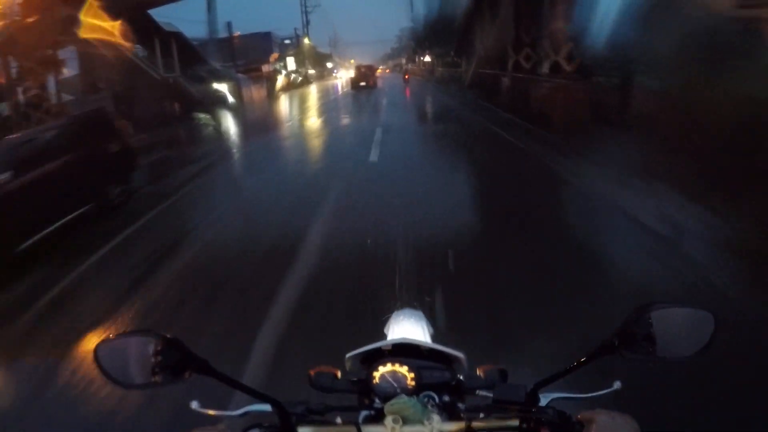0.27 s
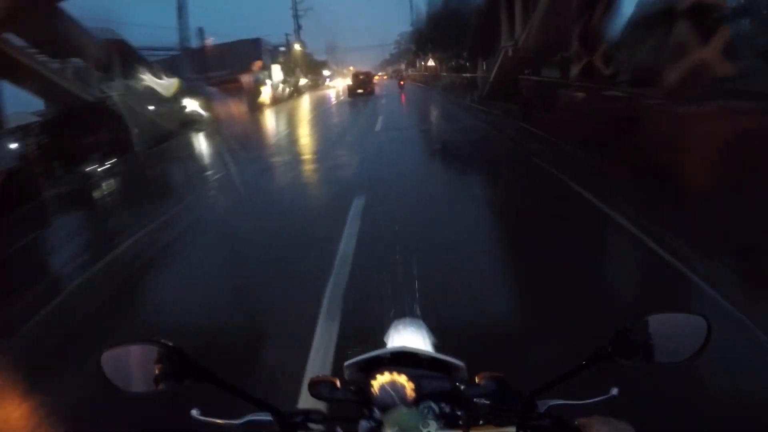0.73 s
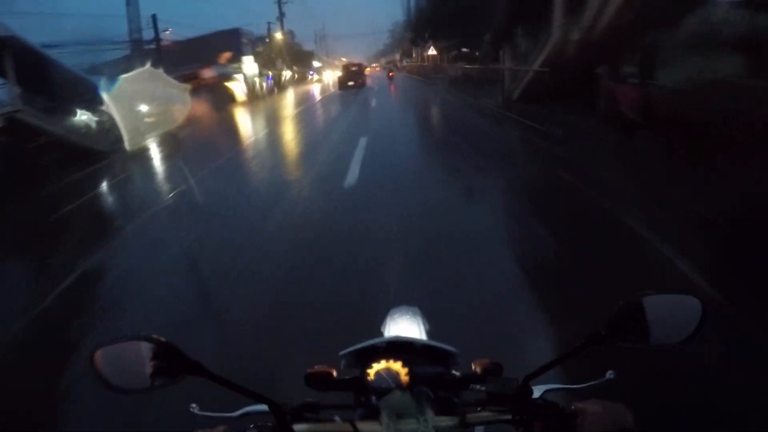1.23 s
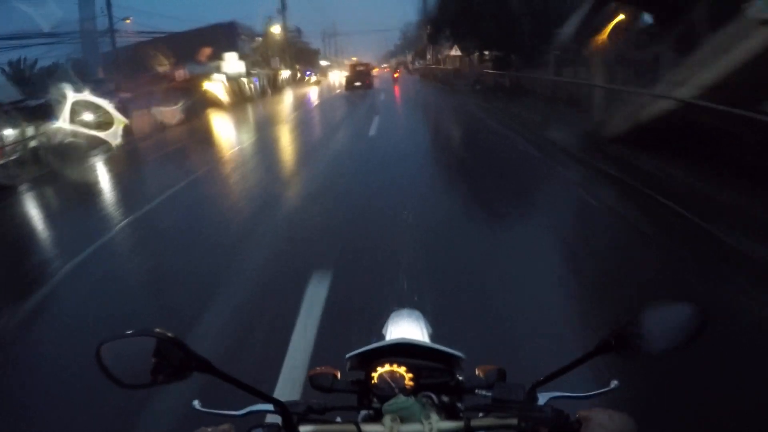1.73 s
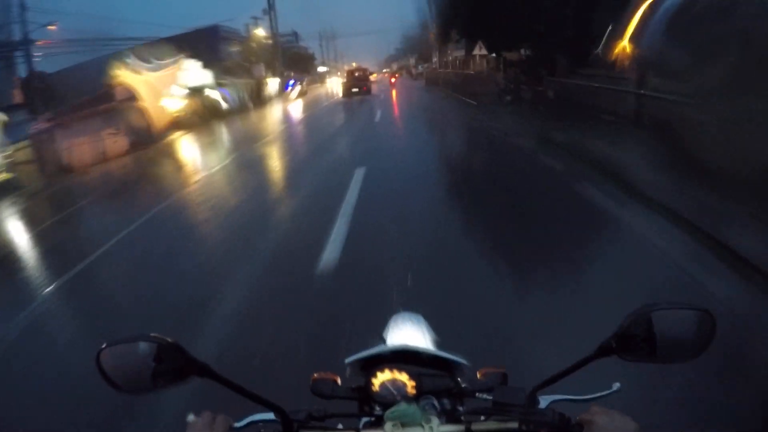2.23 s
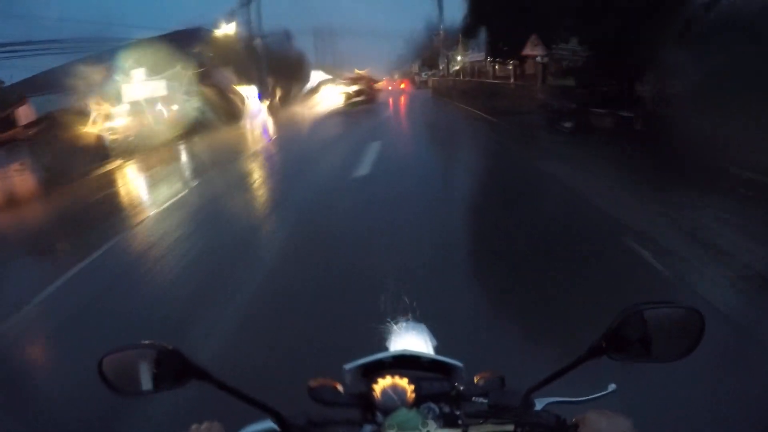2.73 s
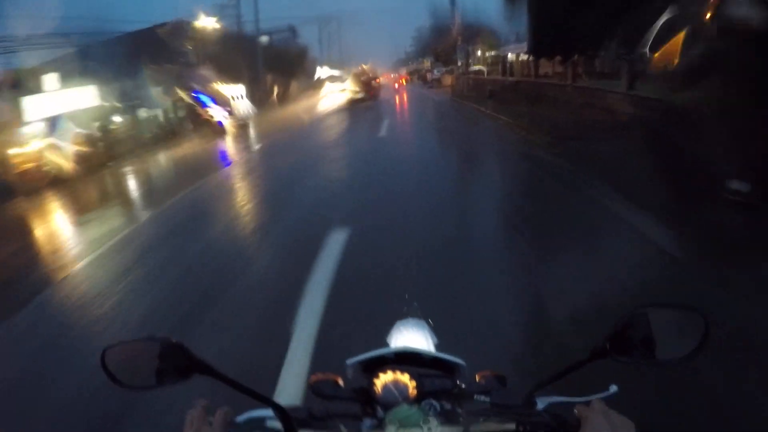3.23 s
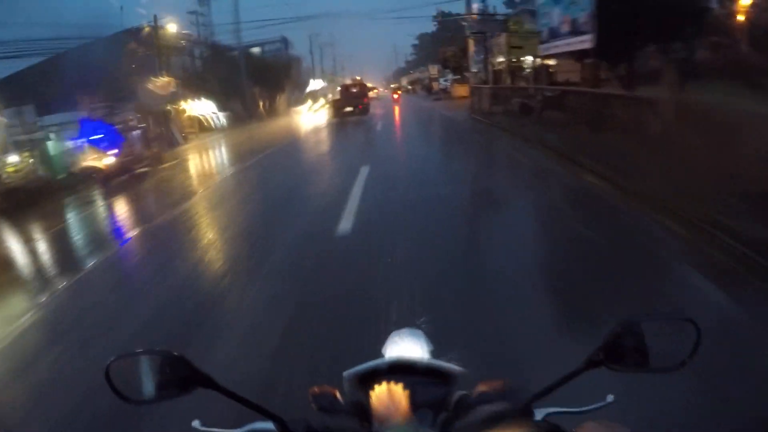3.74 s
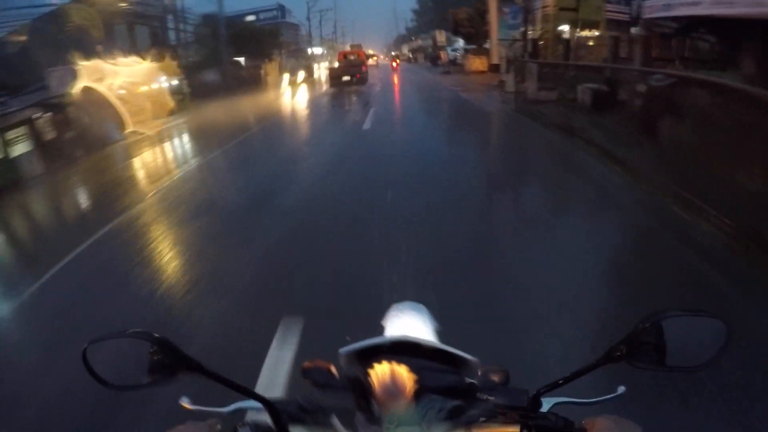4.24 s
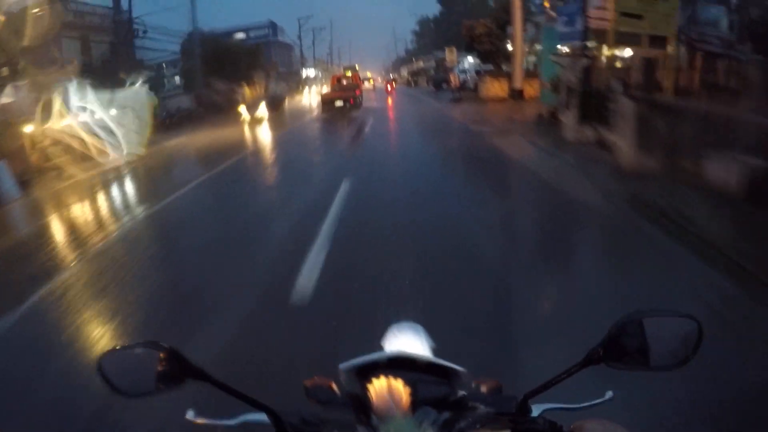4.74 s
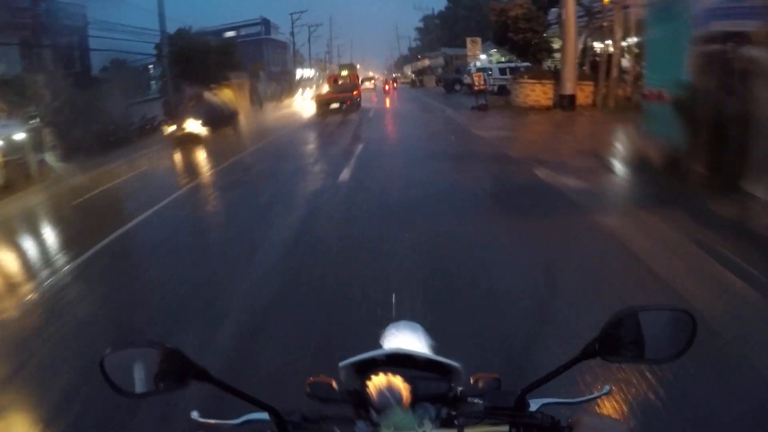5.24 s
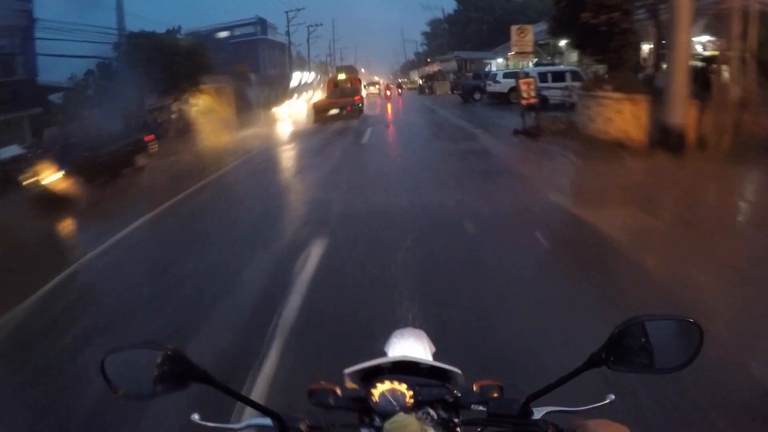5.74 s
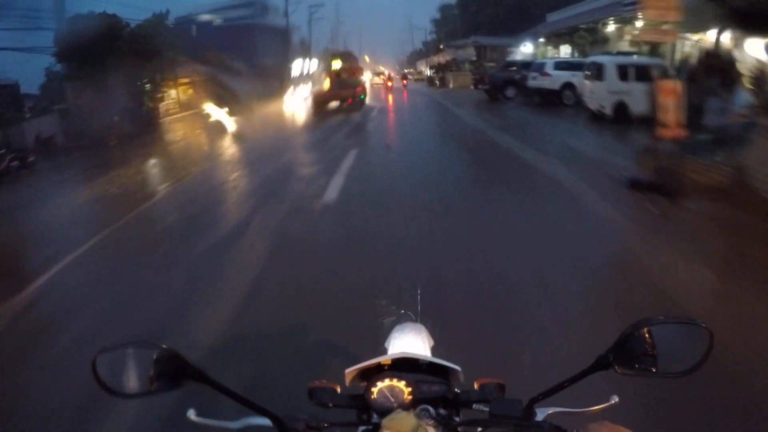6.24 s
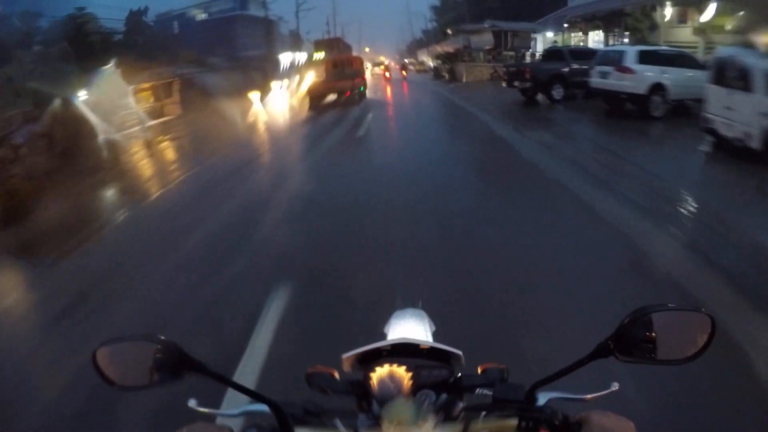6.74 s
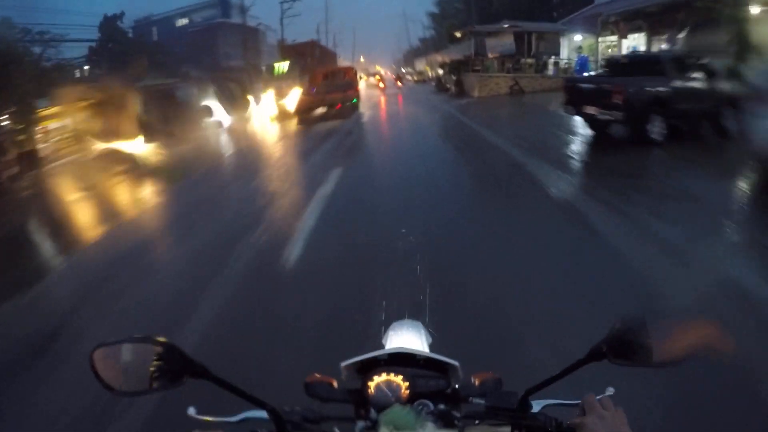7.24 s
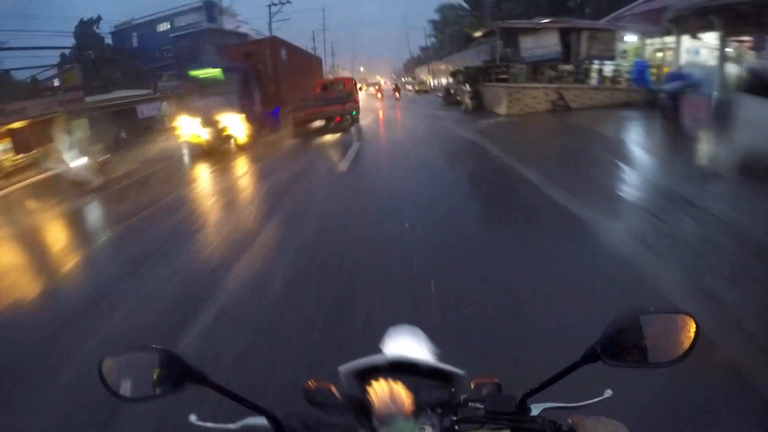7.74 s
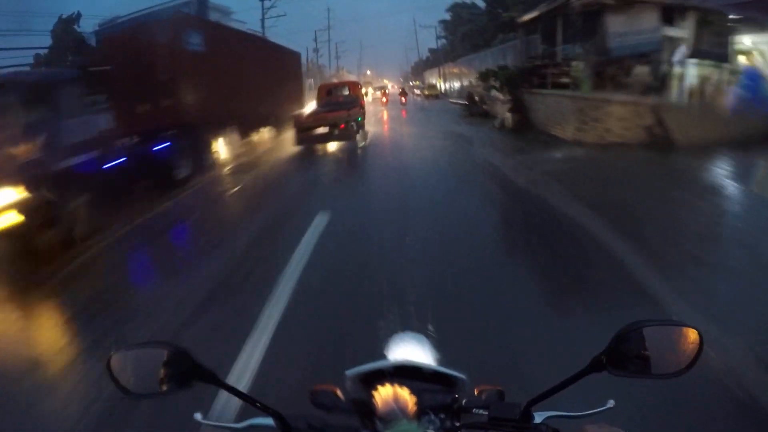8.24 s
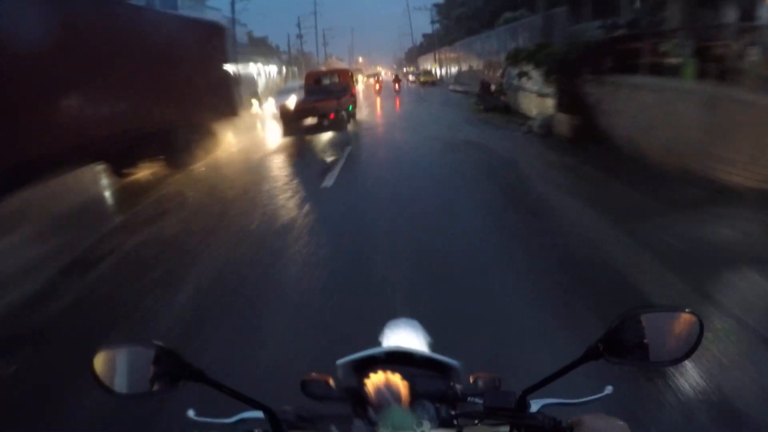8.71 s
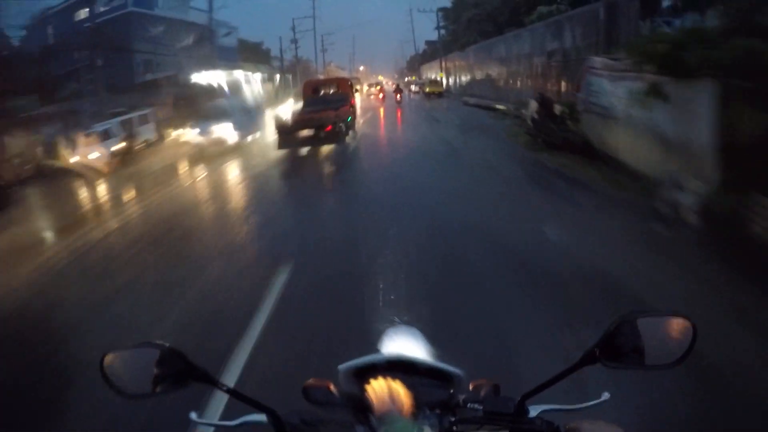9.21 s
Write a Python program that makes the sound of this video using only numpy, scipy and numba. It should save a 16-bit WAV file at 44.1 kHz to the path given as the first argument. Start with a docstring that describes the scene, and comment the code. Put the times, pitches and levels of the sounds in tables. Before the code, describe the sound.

Rain on a wet road ride, with the microphone enclosed in a thin plastic case. Irregular big drops crack and tick over fine dry patter, muffled wind buffeting and flickering hiss. After low thumps near the start the rain eases for a moment, then swells. Very faint high whistles drift in the middle and later part, and spray surges toward the end.

```python
"""Heavy rain on a motorcycle ride, heard inside the plastic housing of a helmet camera.
Throughout, drops ring the housing's short modes, small ones merge into a patter, wind noise rumbles, spray hisses.
From 0.2 s big drops crack, the biggest overloading the input; at 1.1 and 1.5 s dull knocks ring low.
Around 1.3 s the patter thins; it swells near 3 to 3.7 s. Faint high whistles come and go from 4 to 9 s.
The spray is strongest near 7.1 and 8.7 s."""
import sys
import numpy as np
from scipy import signal
from scipy.fft import rfft, irfft
from scipy.io import wavfile
from scipy.ndimage import uniform_filter1d
from numba import njit

SR = 44100
rng = np.random.default_rng(int(sys.argv[2]) if len(sys.argv) > 2 else 0)


def unload_wav(signal):
    """Save mono or channel-first audio to the path in sys.argv[1] as 16-bit WAV at rate SR, clipped to [-1, 1]."""
    wavfile.write(
        sys.argv[1],
        SR,
        np.round(np.clip(np.atleast_2d(signal).T, -1, 1) * 32767).astype(np.int16),
    )


def undo_db(level):
    """Turn decibels back into plain size, where 20 dB means ten times bigger."""
    steps = np.asarray(level, float) / 20
    return 10 ** steps


N = 417627  # samples


def unit(x):
    """Scale to rms 1."""
    return x / np.sqrt(np.mean(x ** 2))


def walk(rate_hz):
    """Random levels, each held 1 / rate_hz, smoothed twice; rms 1."""
    hold = int(SR / rate_hz)
    steps = np.repeat(rng.standard_normal(N // hold + 1), hold)
    smooth = uniform_filter1d(uniform_filter1d(steps, hold), hold)
    return unit(smooth[:N])


def flickering_noise(spectrum, flicker_db, rate_hz):
    """Coloured noise at rms 1; overlapping bands, half an octave apart, flicker independently."""
    hz, db = np.transpose(spectrum)
    octave = np.log2(np.fft.rfftfreq(N, 1 / SR) + 1)
    lowest, highest = np.log2(hz[0]), np.log2(hz[-1])
    bass_cut_db = 10 * np.clip(lowest - octave, 0, None)  # 10 dB per octave below the first row
    shape = undo_db(np.interp(octave, np.log2(hz), db) - bass_cut_db)
    noise = rfft(rng.standard_normal(N)) * shape
    out = 0
    for centre in np.arange(lowest - 1, highest + 1, .5):
        share = np.clip(1 - 2 * abs(octave - centre), 0, 1)
        out = out + irfft(noise * share, N) * undo_db(flicker_db * walk(rate_hz))
    return unit(out)


# Weather. Each row: time in seconds, wind level in dB, patter level in dB before each layer's offset,
# spray level in dB.
WEATHER = [(0.0, -35, -37.5, -43.5), (0.26, -31.5, -31.5, -37.5), (1.05, -41, -36, -45.5),
           (1.32, -40.5, -52.5, -46), (1.6, -36.5, -48, -43.5), (1.77, -38.5, -42.5, -47.5),
           (2.48, -38.5, -36, -44), (2.98, -36, -29.5, -37.5), (3.16, -41, -34, -44),
           (3.72, -31, -29.5, -37.5), (4.25, -42, -39.5, -47), (4.99, -41.5, -35, -44.5),
           (5.25, -37, -32.5, -45.5), (6.67, -34, -36.5, -41), (7.12, -31.5, -31.5, -34.5),
           (7.54, -36, -33, -38.5), (8.7, -34, -32, -33.5), (9.47, -34.5, -32, -37)]


def weather_db(column):
    """One level column of the weather, interpolated to every sample."""
    rows = np.array(WEATHER)
    return np.interp(np.arange(N) / SR, rows[:, 0], rows[:, column])


# Wind spectrum. Each row: frequency in Hz, relative density in dB per Hz.
WIND_SPECTRUM = [(22, 4), (45, -2), (66, 3), (80, -2.5), (95, 1), (135, -13), (185, -14), (300, -19),
                 (600, -29.5)]


def wind():
    """Wind buffeting the housing: low noise whose level wanders about the weather curve."""
    level_db = weather_db(1) + 2.76 * walk(7)
    return undo_db(level_db) * flickering_noise(WIND_SPECTRUM, flicker_db=0.93, rate_hz=12)


# Spray spectrum. Each row: frequency in Hz, relative density in dB per Hz.
SPRAY_SPECTRUM = [(600, -5.5), (1030, -6), (1300, 7), (1500, 0), (2600, 0), (3370, -11), (4700, -8),
                  (5350, -14.5), (7600, -26), (8400, -27), (15000, -32.5)]


def spray():
    """Road spray heard through the housing: a hiss whose bands flicker fast."""
    return undo_db(weather_db(3)) * flickering_noise(SPRAY_SPECTRUM, flicker_db=3.5, rate_hz=28)


# Faint whistles. Each row: start in seconds, end in seconds, start frequency in Hz, end frequency in Hz,
# mean level in dB.
WHISTLE_TONES = [(4.35, 5.25, 13780, 13700, -69), (4.05, 4.65, 12300, 12200, -75),
                 (5.65, 6.17, 13600, 13300, -66), (5.9, 6.15, 12000, 11800, -70),
                 (6.85, 7.0, 11450, 11400, -70), (7.08, 7.3, 11250, 11400, -65),
                 (7.8, 7.92, 11250, 11400, -68), (8.0, 8.6, 12750, 12950, -70),
                 (8.45, 8.95, 11250, 11500, -71)]


def whistles():
    """Thin high sines that glide, waver fast, flicker and fade in and out."""
    t = np.arange(N) / SR
    out = 0
    for start_s, end_s, from_hz, to_hz, db in WHISTLE_TONES:
        glide_hz = np.interp(t, [start_s, end_s], [from_hz, to_hz])
        hz = glide_hz * (1 + .005 * walk(400))
        fade = np.clip(np.minimum(t - start_s, end_s - t) / .06, 0, 1)
        level = undo_db(db + 3 * walk(20))
        out = out + fade * level * np.sin(2 * np.pi * np.cumsum(hz) / SR)
    return out


@njit
def ring(start_s, hz, gain, t60_s, rise_cycles, size, sr):
    """Every blow starts every mode: a sine that swells over some cycles, then dies away."""
    out = np.zeros(size)
    for e in range(start_s.shape[0]):
        for m in range(start_s.shape[1]):
            pole = np.exp(2j * np.pi * hz[e, m] / sr - np.log(1000) / (t60_s[e, m] * sr))
            z, gap, close = gain[e, m] + 0j, 1., np.exp(-hz[e, m] / (rise_cycles * sr))
            first = int(start_s[e, m] * sr)
            for j in range(max(first, 0), min(first + int(t60_s[e, m] * sr), size)):
                z, gap = z * pole, gap * close
                out[j] += z.imag * (1 - gap)
    return out


# Dull knocks. Each row: start in seconds, level in dB, frequency in Hz, t60 in seconds.
KNOCK_RINGS = [(1.144, -13.5, 67, 0.11), (1.515, -19.5, 84, 0.21), (1.521, -18, 170, 0.077)]


def knocks():
    """Low decaying rings of the whole housing on its mount."""
    s, db, hz, t60_s = np.transpose(KNOCK_RINGS)[:, :, None]
    return ring(s, hz, undo_db(db), t60_s, 0.1, N, 1. * SR)


# Housing modes. Each row: nominal frequency in Hz, relative level in dB, nominal t60 in seconds.
HOUSING_MODES = [(400, -35, 0.01), (637, -14, 0.038), (845, 2.5, 0.012), (1005, -8, 0.014),
                 (1330, -4, 0.012), (1717, -4.5, 0.009), (2107, -3.5, 0.012), (2453, -8, 0.013),
                 (2823, -6, 0.013), (3340, -13, 0.01), (3873, -2.5, 0.0061), (4573, -4, 0.0047),
                 (5600, -13, 0.0036), (5950, -14.5, 0.0076), (7150, -0.5, 0.0029), (9400, -5.5, 0.0019),
                 (10650, -10.5, 0.0023), (13130, -5, 0.0011), (15600, -43, .003)]
# Colour regions. Each row: frequency in Hz, colour index (0 deep, 1 middle, 2 bright, 3 crack).
COLOUR_NODES = ((850, 0), (1500, 1), (2900, 1), (3800, 2), (5000, 2), (7000, 3))


def strikes(drops, scatter_db, spread_s, rise_cycles):
    """Drops ring the housing; each lands elsewhere: mode strength, sign, start, tuning and decay vary."""
    s, level_db, deep_db, bright_db, crack_db = np.transpose(drops)
    hz, mode_db, t60_s = np.transpose(HOUSING_MODES)
    node_hz, region = np.transpose(COLOUR_NODES)
    weights = np.array([np.interp(np.log(hz), np.log(node_hz), region == k) for k in range(4)])
    colour_db = np.transpose([deep_db, 0 * s, bright_db, crack_db]) @ weights
    spot = rng.standard_normal((len(s), 4, len(hz)))
    gain_db = level_db[:, None] + colour_db + mode_db + scatter_db * spot[:, 0]
    gain = np.sign(spot[:, 1]) * undo_db(gain_db)
    start_s = s[:, None] + spread_s * abs(spot[:, 1])
    tuned_hz = hz * (1 + .03 * spot[:, 2])
    decay_s = t60_s * np.exp(0.14 * spot[:, 3])
    return ring(start_s, tuned_hz, gain, decay_s, rise_cycles, N, 1. * SR)


def patter(count, step_db, cap_db, base_db, deep_db, bright_db, crack_db, variety_db):
    """Drops at random moments: many faint, few strong; duller or brighter by where they land."""
    when, size = rng.random((count, 2)).T
    bright, deep = rng.standard_normal((count, 2)).T
    sample = when * N
    excess_db = np.minimum(-step_db * np.log(1 - size), cap_db)
    level_db = weather_db(2)[sample.astype(int)] + excess_db + base_db
    deep_db = deep_db + 3 * deep
    crack_db = crack_db + 1.32 * variety_db * bright
    bright_db = bright_db + variety_db * bright
    drops = np.transpose([sample / SR, level_db, deep_db, bright_db, crack_db])
    return strikes(drops, scatter_db=5, spread_s=.0015, rise_cycles=0.29)


# Big drops. Each row: time in seconds, strike level in dB, deep ring in dB, crispness in dB;
# the last two relative to the strike.
BIG_DROPS = [(0.202, -9, -19, -3.5), (.2643, -11.5, -9, -6), (.276, -4, -7.5, -14), (0.3092, 0.5, -14, 6.5),
             (0.3195, -13, -9, -2), (.459, -8, -12, -1), (.487, -0.5, -14.5, 6.5), (0.634, -11, -4.5, -23),
             (.673, 2.5, -24, -6.5), (0.697, 4.5, -24, 3), (1.0859, -13.5, -10, -14), (1.1387, 7, -10, -15),
             (1.1619, -13.5, -13, 2), (1.1879, 1, -28, -12), (1.1992, -13.5, -10, 6),
             (1.5145, -15.5, 1.5, -21), (1.6574, -4, -14.5, -10), (1.723, -20, -11, 6.5),
             (1.7488, -17.5, -15, 8), (1.7754, -22, -4, 10), (1.7964, -1, -34, -1), (1.8073, 10.5, -26, -5),
             (1.8714, -3, -37, 6), (1.9543, -11, -7, -3), (2.1702, -17.5, -1.5, 8.5),
             (2.3607, -3, -39, 4.5), (2.7011, -15.5, -17, -5), (2.7868, -13.5, -10, -19),
             (2.8263, -8, -9, -13), (2.8769, -8, -13, -16), (2.9321, -1, -30, 10), (2.9434, -10.5, -8.5, 7),
             (2.9952, 3.5, -40, -3.5), (3.0826, -10.5, -11, -7), (3.1, -8.5, -15, -20),
             (3.5448, -13.5, -11, 9.5), (3.6687, -12, -28, -12), (3.7072, -12, -0.5, 7),
             (3.8107, -6, -23, 1.5), (3.8364, 4.5, -32, -2), (3.85, -5, -22, -1), (3.941, -16.5, -12, 15.5),
             (3.955, -3.5, 2, 7.5), (4.0504, 2, -40, -2.5), (4.1964, -2, -13.5, -2),
             (4.3882, -9.5, -16, -9), (4.502, 3, -15.5, 8.5), (4.9719, -9.5, -13, 11),
             (5.3342, -12.5, -16, 5.5), (5.3467, -7, -10.5, -14), (5.3693, -6, -14, 3.5),
             (5.4038, -6.5, -14, 0), (5.4132, -10, -17, -12), (5.4271, -5, -20, 15), (5.4788, 2, -38, 0),
             (5.5242, -10, -16, 0), (5.6786, -15.5, -12, -19), (5.7767, -12, -6, 5.5),
             (5.8446, -9.5, -17, 9.5), (5.8964, -9, -15, -2.5), (5.9463, -12.5, -21, 6),
             (6.0217, -11, -13, -19), (6.0696, -11.5, -15, 9.5), (6.123, -15, -12, 2),
             (6.1725, -7.5, -27, -4), (6.1821, -9.5, -12, 5.5), (6.218, -13.5, -4.5, 6.5),
             (6.2966, -9, -26, 10), (6.3175, -13, -22, -18), (6.37, -6.5, -9.5, 16.5), (6.455, -10, -4, 10),
             (6.5637, -12.5, -13.5, 8), (6.753, -13.5, -14, -20), (7.0636, -16, -25, 8),
             (7.1729, -8, 4.5, 11.5), (7.282, -16, -14, -16), (7.3668, 2, 1, 4.5), (7.3784, -5, -24, 4),
             (7.41, -4.5, -32, -3), (7.522, -6.5, -11, 2), (7.7293, 0.5, -17.5, 4),
             (7.9023, -8.5, -10, 10.5), (8.2118, -13.5, -30, 7), (8.2344, -12, -32, -25),
             (8.3295, -7, -30, -9.5), (8.3624, -10, -7, -12), (8.4118, -22.5, 12, -10),
             (8.5769, -8, -12, 0), (8.6415, -9, -7, -18), (8.6679, 2, -28, 5.5), (8.6876, -8.5, -16, 0.5),
             (8.777, -2.5, -22, 6.5), (8.809, -14.5, -9, -1), (9.1186, -6.5, -30, -3),
             (9.135, -9.5, -29, 5), (9.199, -10.5, -4, -15), (9.357, -10, -33, -1), (9.42, -8, -15, -3)]


def big_drops():
    """The big drops with their colours: crispness lifts the bright ring and, more steeply, the crack."""
    s, level_db, deep_db, crisp_db = np.transpose(BIG_DROPS)
    crack_db = -10 + 1.03 * crisp_db
    return np.transpose([s, level_db, deep_db, crisp_db, crack_db])


def splashes(count, gap_s, weaker_db, duller_db):
    """Each big drop breaks into later, duller droplets; loud, crisp drops have the most taken off."""
    drops = np.repeat(big_drops(), count, axis=0)
    late, size = rng.random((len(drops), 2)).T
    loss_db = weaker_db + 8 * late + 6 * size + 0.53 * drops[:, 4] + 0.45 * drops[:, 1]
    drops[:, 0] += 0.0015 + gap_s * late ** 1.5
    drops[:, 1] -= loss_db
    drops[:, 4] -= duller_db
    return strikes(drops, scatter_db=5, spread_s=0.00055, rise_cycles=0.54)


def scene():
    """Rain on the housing over wind and spray."""
    background = wind() + spray() + whistles() + knocks()
    dull = patter(count=1100, step_db=7.5, cap_db=14, base_db=-0.5,
                  deep_db=-12.0, bright_db=-10.5, crack_db=-22.0, variety_db=4)
    crisp = patter(count=500, step_db=1, cap_db=10.0, base_db=-7.5,
                   deep_db=-4.5, bright_db=4.5, crack_db=-3.5, variety_db=4)
    middling = patter(count=70, step_db=1.5, cap_db=4, base_db=12,
                      deep_db=-15, bright_db=-0.5, crack_db=-10, variety_db=7)
    droplets = splashes(count=4, gap_s=.012, weaker_db=27, duller_db=16)
    big = strikes(big_drops(), scatter_db=3.0, spread_s=.0003, rise_cycles=0.42)
    return (background + dull + crisp + middling + droplets + big)[None]


def low_pass(x):
    """Removes everything above the highest recorded frequency."""
    return signal.sosfilt(signal.butter(12, 16440, fs=SR, output="sos"), x)


def record(dry):
    """Treble above 15.2 kHz is cut; the input clips on the biggest drops."""
    lowpass = signal.ellip(6, .1, 20, 15200, fs=SR, output="sos")
    low = signal.sosfiltfilt(lowpass, dry)
    mix = np.clip(low, -.97, .97)
    return low_pass(mix)


dry = scene()
out = record(dry)
unload_wav(out)
```